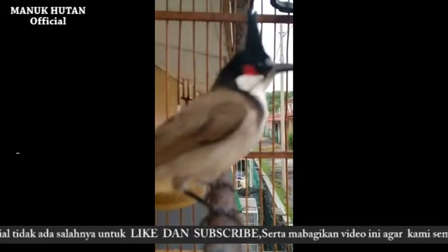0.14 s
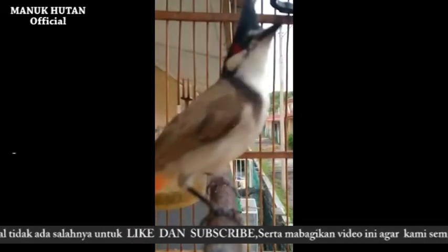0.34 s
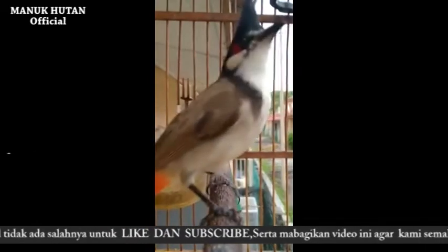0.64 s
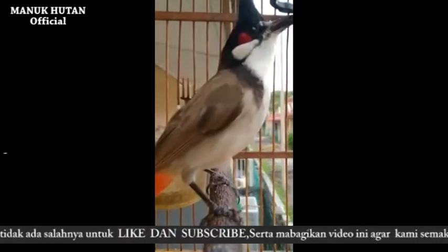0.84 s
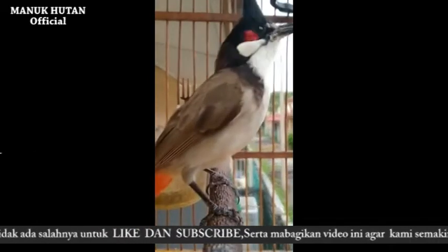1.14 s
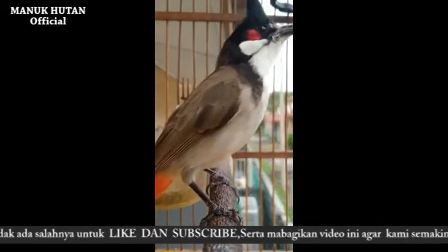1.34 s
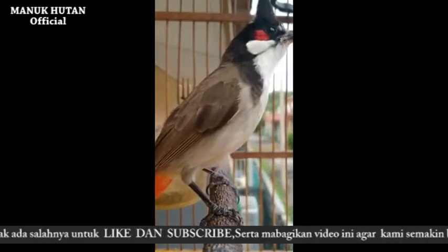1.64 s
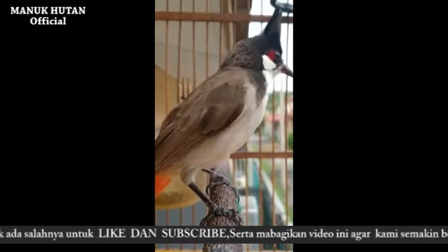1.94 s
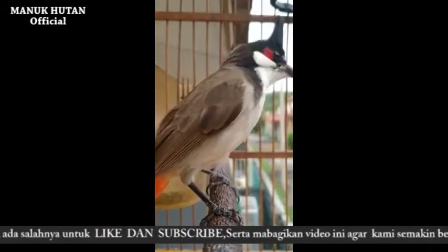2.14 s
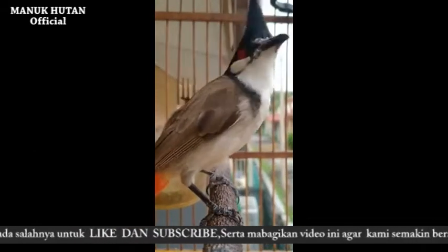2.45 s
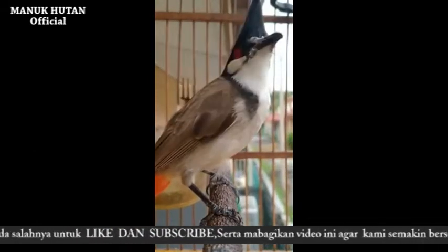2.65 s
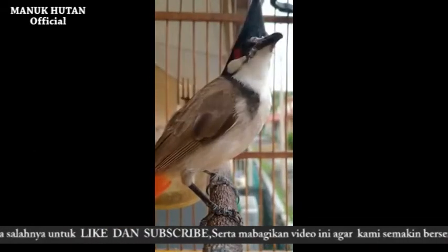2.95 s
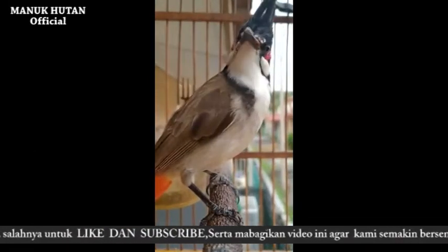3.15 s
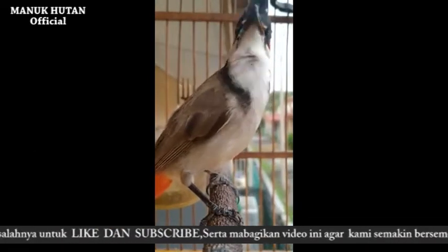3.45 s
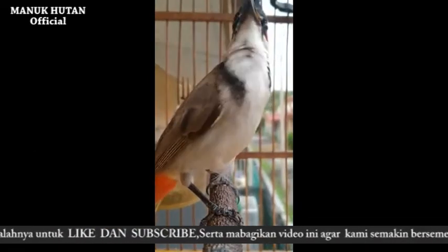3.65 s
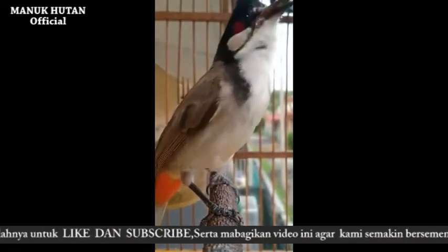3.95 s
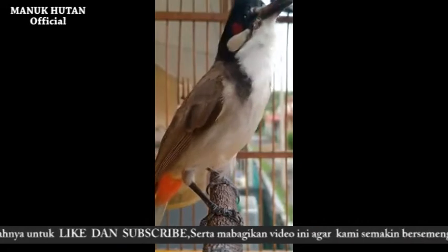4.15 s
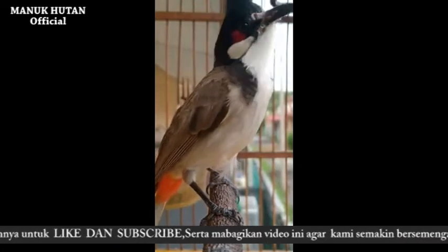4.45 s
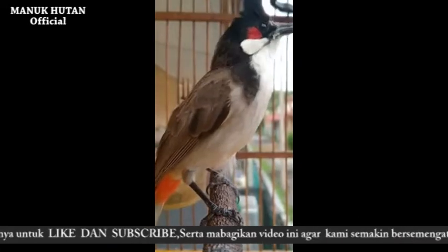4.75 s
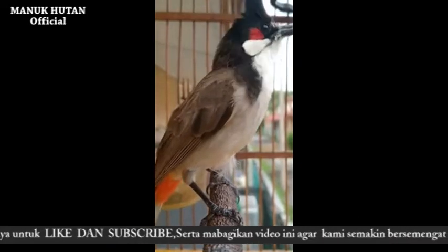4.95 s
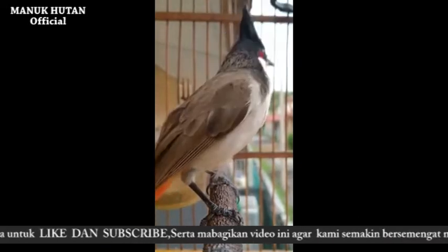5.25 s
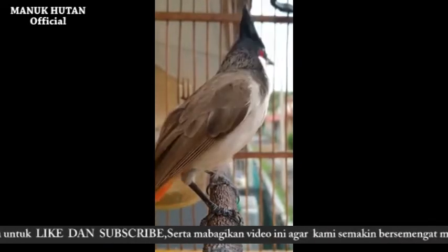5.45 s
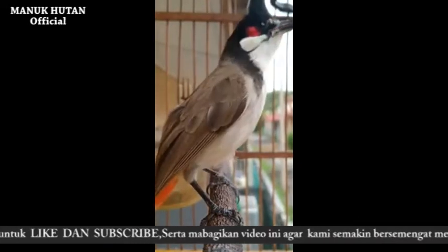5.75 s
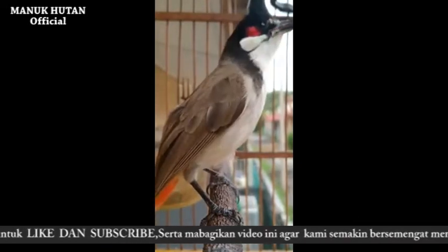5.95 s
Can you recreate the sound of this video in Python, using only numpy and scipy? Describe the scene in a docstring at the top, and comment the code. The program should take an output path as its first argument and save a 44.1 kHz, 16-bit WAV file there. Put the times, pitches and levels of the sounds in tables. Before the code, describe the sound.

Mostly quiet outdoor ambience: soft far traffic, low rumble, airy hiss and small wind thumps on the microphone. Early on, a nearby bird mutters quiet raspy notes as feathers brush and a finger taps lightly. A far bird whistles downward, blurred by veranda echo, and a muffled knock follows. After two more distant whistles, the near bird bursts into three short, loud, clear chirps with fast trills, leaving a short bright echo and near silence, with one last barely audible far call.

```python
"""On a veranda, close to a phone's microphone, a caged bulbul mutters soft, hoarse notes from 0.4 s,
with feathers brushing and a tap of a finger on the phone. A far bird answers at 0.9 s, mostly as echo; the
third soft note follows at 1.1 s and a far, dull knock at 1.8 s. The far bird calls twice after 3 s; from 4.2 s
the bulbul sings three loud, warbling chirps, and a last far call comes at 6 s. Birds are gliding whistles with
overtones and rasp; under them lie shaped-noise street, rumble and hiss, faint tones and puffs of wind."""
import sys
import numpy as np
from scipy import signal
from scipy.fft import rfft, irfft, next_fast_len
from scipy.io import wavfile
from scipy.ndimage import uniform_filter1d, map_coordinates

SR = 44100
rng = np.random.default_rng(int(sys.argv[2]) if len(sys.argv) > 2 else 0)


def wav_out(sig):
    """Save sig, one row per channel (or a flat mono array), as 16-bit PCM at SR to the path in sys.argv[1]."""
    wavfile.write(sys.argv[1], SR, np.round(np.clip(np.atleast_2d(sig).T, -1, 1) * 32767).astype(np.int16))


N = 268921
T = np.arange(N) / SR  # time in seconds

# Loud chirps close to the microphone, note by note. Each row: overtones in dB and rasp in dB against the
# note, then its course, whose rows are: time in seconds, pitch in Hz (before any warble), level in dB.
CHIRP_NOTES = [(-20.5, -21, [(4.231, 1793, -59.5), (4.235, 1910, -39.5), (4.2405, 2176, -43),
               (4.243, 2930, -20), (4.247, 3010, -25.5), (4.255, 3240, -15.5), (4.267, 3238, -17),
               (4.276, 3182, -16), (4.2805, 2990, -23.5), (4.283, 3000, -20.5), (4.288, 3190, -16),
               (4.2915, 3290, -40.5)]), (-14, -11.5, [(4.296, 2200, -69), (4.301, 1630, -60.5),
               (4.307, 1090, -60.5)]), (-22, -13.5, [(4.494, 1900, -57), (4.502, 1930, -53.5),
               (4.506, 2693, -44.5), (4.5095, 3830, -31.5), (4.512, 2950, -22), (4.52, 2930, -16),
               (4.527, 2690, -27.5), (4.541, 2730, -20.5), (4.5475, 2668, -32.5)]),
               (-11, 4, [(4.5477, 2766, -29), (4.551, 2522, -31), (4.5573, 2400, -31.5)]),
               (-13.5, -19.5, [(4.5575, 2623, -34), (4.5605, 3260, -14.5), (4.567, 3317, -16.5),
               (4.584, 3314, -17), (4.589, 3336, -20.5), (4.598, 3526, -31), (4.6005, 3140, -35)]),
               (-22.5, -17.5, [(4.601, 1900, -53.5), (4.605, 1350, -54), (4.611, 886, -61)]),
               (-15.5, -16.5, [(4.665, 1068, -54), (4.671, 1974, -41), (4.678, 2130, -29),
               (4.682, 2065, -21.5)]), (-12, -16, [(4.6822, 2083, -22), (4.687, 2068, -17.5),
               (4.697, 1879, -26)]), (-22.5, -7, [(4.6972, 2000, -21.5), (4.7, 2600, -36.5),
               (4.704, 2465, -23.5), (4.709, 2330, -24), (4.7105, 2385, -32), (4.7125, 2837, -19.5),
               (4.719, 2716, -25.5), (4.7235, 2630, -29.5), (4.7265, 2980, -18.5), (4.73, 2947, -18),
               (4.733, 2742, -35), (4.7393, 2710, -32)]), (-27, -20, [(4.7395, 2840, -34),
               (4.743, 3880, -30), (4.746, 3137, -14.5), (4.75, 3010, -19.5), (4.759, 2994, -20.5),
               (4.763, 3357, -33), (4.766, 2837, -27), (4.7685, 2247, -36.5), (4.7713, 2880, -36)]),
               (-13.5, -16.5, [(4.7715, 2557, -41), (4.777, 2287, -24.5), (4.788, 2226, -29.5),
               (4.795, 2146, -26.5), (4.8, 2162, -38.5)])]
# Fast pitch swings on the chirps. Each row: first crest in seconds, number of swings, swings per second,
# depth in Hz, centre away from the throat's tuning in Hz, dying time in seconds, throat width in Hz,
# lean from 0 to 1 (quick rise, slow sag).
CHIRP_WARBLES = [(4.2432, 2.85, 86, 500, -250, .045, 250, .25), (4.511, 3.8, 222, 190, -170, .02, 160, 0),
                 (4.5635, 3.2, 82, 720, 300, .022, 380, 0)]
# Strength of an overtone by where it falls, before the fall per overtone. Each row: frequency in Hz, level in dB.
CHIRP_OVERTONES = [(2400, -1), (4500, -7), (6500, -21), (8200, -11.5), (10000, -18.5), (12000, -10.5),
                   (15000, -8), (16200, -28)]
# Air in the throat while singing. Each row: frequency in Hz, relative level in dB per Hz.
CHIRP_AIR = [(2940, -29.5), (5000, -0.5), (5810, -22), (7920, -7.5), (8410, -9.5), (8880, -46),
             (9340, -39.5), (9960, -17), (10800, 0.5), (13200, -7.5), (15200, 13.5), (16300, -16.5),
             (16500, -21.5)]
# Soft, hoarse notes of the near bird. Each row: overtones in dB and rasp in dB against the note, then its
# course, whose rows are: time in seconds, pitch in Hz, level in dB.
MUTTER_NOTES = [(0.5, -9, [(.422, 1167, -59), (.429, 1273, -53), (.434, 1767, -55), (.439, 2006, -46),
                (.446, 1920, -53), (.45, 1880, -68)]), (-1, -10, [(.487, 1250, -65), (.493, 1125, -54),
                (.5, 1600, -54), (.506, 1154, -48.5), (.511, 1380, -56), (.516, 1580, -58),
                (.52, 1750, -60)]), (-15, -30, [(1.062, 1098, -72), (1.065, 1186, -59),
                (1.068, 1202, -66)]), (2, -12, [(1.074, 1065, -54), (1.08, 1403, -49), (1.085, 2080, -43),
                (1.0885, 1382, -44), (1.094, 1657, -49), (1.1, 1950, -40.5), (1.109, 1393, -61),
                (1.113, 1550, -74), (1.128, 1770, -72)])]
# Overtones of the soft notes, before the fall per overtone. Each row: frequency in Hz, level in dB.
MUTTER_OVERTONES = [(2200, -15), (3100, 2.5), (3900, -14), (4800, -13.5), (6000, -53), (7500, -18),
                    (9000, -25), (16000, -38)]
# Air in the soft notes. Each row: frequency in Hz, relative level in dB per Hz.
MUTTER_AIR = [(700, -27), (1500, 11), (3000, 5.5), (5000, -20), (8000, 0), (13000, -12), (15200, -7),
              (15800, -43)]
# A notch near 9 kHz, left by audio coding. The one row: centre in Hz, width in Hz, depth in dB.
CODING_NOTCH = (8950, 1400, -31)
# The far bird; its direct sound is turned down later. Each row: overtones in dB and rasp in dB against the
# note, then its course, whose rows are: time in seconds, pitch in Hz, level in dB.
FAR_NOTES = [(-40, -60, [(.855, 1910, -59), (.868, 2850, -51), (.885, 3387, -58.5), (.92, 2836, -52.5),
             (.954, 2450, -61)]), (-40, -55, [(3.08, 2730, -63), (3.088, 3510, -50.5), (3.099, 3880, -60),
             (3.112, 3420, -47), (3.125, 2940, -48), (3.136, 2600, -59)]), (-40, -55, [(3.258, 4740, -60),
             (3.266, 3960, -60), (3.269, 3750, -46), (3.278, 3440, -49), (3.287, 3180, -49),
             (3.305, 2850, -46.5), (3.335, 2470, -49.5), (3.36, 2100, -59.5), (3.4, 1680, -65)]),
             (-42, -59, [(6.02, 1745, -85), (6.034, 2100, -72), (6.049, 2500, -81)])]
# Reverberation of the veranda, before each distance stretches it. Each row: frequency in Hz, t60 in seconds.
VERANDA_T60 = [(1000, 0.17), (2200, 0.46), (3000, 0.44), (5000, 0.376), (12000, 0.14)]
# What the walls send back of the near bird. Each row: frequency in Hz, level in dB.
WALL_RETURN = [(1000, -34), (2200, -16), (3000, -22.5), (4000, -19.5), (8000, -19), (14000, -18)]
# Wind puffs on the microphone. Each row: centre in seconds, peak in dB, frequency in Hz.
WIND_PUFFS = [(0.433, -43, 53), (0.494, -47.5, 35), (0.759, -44.5, 45), (.85, -47, 29.6),
              (1.411, -46.5, 38.4), (1.509, -44, 44.8), (1.798, -44, 35.6), (1.889, -42.5, 56),
              (2.5, -49, 30.2), (2.614, -39.5, 33), (3.65, -54, 60), (5.488, -59, 41.1)]
# A finger on the phone. The one row: level in dB before the push is shaped, length of the push in seconds.
FINGER_TAP = (-36, .0025)
# Feathers brushing. Each row: centre in seconds, length in seconds, level in dB.
FEATHER_RUSTLES = [(0.408, 0.033, -65), (0.434, 0.014, -55.5), (0.458, 0.041, -70)]
# A far, dull knock. The one row: level in dB, t60 in seconds.
FAR_KNOCK = (-53, 0.56)
# Colour of the knock. Each row: frequency in Hz, relative level in dB per Hz.
KNOCK_COLOUR = [(200, 1.5), (500, 0.5), (1000, 1.5), (2000, -4), (3200, -15.5), (5000, -37)]
# Faint, wavering tones. Each row: centre in seconds, length in seconds, pitch in Hz, level in dB.
FAINT_TONES = [(0.62, 0.17, 431, -72), (2.397, 0.064, 1385, -73), (3.16, 0.038, 1153, -69),
               (3.173, 0.13, 495, -71.5), (3.666, .18, 520, -74), (5.022, 0.17, 340, -74),
               (5.522, 0.092, 1067, -78.5), (5.547, 0.12, 2168, -82.5), (5.599, .05, 712, -78)]
# Course of the background. Each row: time in seconds, traffic in dB, hiss in dB.
STREET_LEVELS = [(0.0, -69, -84), (0.17, -69, -75), (0.4, -64.5, -73.5), (0.7, -66, -77.5),
                 (0.999, -65, -78), (1.3, -68.5, -80), (1.75, -68, -83.5), (1.88, -66, -78),
                 (2.2, -69.5, -80.5), (2.7, -65, -70), (3.04, -66, -77), (3.5, -66, -77), (4.1, -74, -84.5),
                 (4.43, -66, -77.5), (4.65, -73, -74), (4.9, -65.5, -75.5), (5.33, -72, -84.5),
                 (6.1, -73, -85.5)]
# Colours of far traffic, its rumble and the air hiss. Each row: frequency in Hz, relative level in dB per Hz.
TRAFFIC_COLOUR = [(80, -31.5), (150, 0), (400, -4.5), (1000, -6.5), (2500, -12), (4000, -19), (6000, -42)]
RUMBLE_COLOUR = [(10, -2), (30, -0.5), (70, -8), (90, -6), (105, -1), (125, -8.5), (160, -19), (300, -53.5)]
HISS_COLOUR = [(1500, -5.5), (4000, -1), (7500, 2), (9000, -1.5), (11000, -2.5), (13500, -0.5),
               (13900, -11), (14400, -51.5)]

TAP_S, KNOCK_S = .4495, 1.826  # starts in seconds
RUMBLE_DB = 6  # rumble over the traffic
JOIN_S = .002  # one note fades into the next
STRAIN = 0.21  # share of the whistle's loss in dB that the overtones and the rasp gain
TOP_HZ = 16600  # band limit of the phone


def voice(notes, warbles, colour, air, fall_db, rough):
    """A bird's whistle glides from note to note, with overtones, a faint half pitch and a rasp of air."""
    tone, over, rasp = np.zeros((3, N))
    for over_db, rasp_db, rows in notes:
        s, _, db = np.transpose(rows)
        span = slice(round((s[0] - JOIN_S) * SR), round((s[-1] + JOIN_S) * SR))
        t = T[span]
        fade = np.clip(np.minimum(t - s[0], s[-1] - t) / JOIN_S + .5, 0, 1)
        swell = amp(np.interp(t, s, db)) * fade
        tone[span] += swell
        over[span] += swell * amp(over_db)
        rasp[span] += swell * amp(rasp_db)

    # away from its tuning the throat weakens the whistle and strengthens the rest
    swing_hz, loss_db = warble(warbles)
    strain = amp(STRAIN * loss_db)
    tone = smooth(tone * amp(-loss_db), 1)
    over = smooth(over * strain, 1)
    rasp = smooth(rasp * strain, 6)

    s, pitch_hz, _ = np.concatenate([rows for *_, rows in notes]).T
    glide = smooth(np.interp(T, s, pitch_hz) + swing_hz, 2)
    hz = glide * (1 + .05 * rough * wobble(400))
    phase = 2 * np.pi * np.cumsum(hz) / SR
    overtones = np.zeros(N)
    for k in range(2, 9):
        level_db = along(colour, k * hz) - fall_db * (k - 1.5) + 4.18 * wobble(250)
        overtones += amp(level_db) * np.sin(k * phase)
    flutter = amp(5 * rough * wobble(500))
    half_pitch = amp(-46.5) * np.sin(phase / 2)
    whistle = tone * (flutter * np.sin(phase) + half_pitch) + over * overtones
    # the air pulses once per cycle of the whistle
    breath = rasp * (1 + 0.4 * np.cos(phase)) * noise(air, patchy_db=7.5)
    centre, width, depth_db = CODING_NOTCH
    notch = lambda hz: amp(depth_db * np.exp(-(2 * (hz - centre) / width) ** 4))
    return filtered(np.sqrt(2) * whistle + breath, notch)


def warble(rows):
    """Dying swings of pitch (Hz) off the throat's tuning, and the level (dB) the whistle loses there."""
    swing_hz, loss_db = np.zeros((2, N))
    for crest, count, rate, depth_hz, centre_hz, dying, width_hz, lean in rows:
        turns = (T - crest) * rate
        gate = np.clip(4 * turns + 1, 0, 1) * np.clip(2 * (count - turns), 0, 1)
        angle = 2 * np.pi * turns
        swing = np.cos(angle + lean * (np.cos(angle) - 1))
        depth = depth_hz * np.exp(-((T - crest) / dying) ** 2)
        away = gate * (centre_hz + depth * swing)
        swing_hz += away
        loss_db += 20 * np.log10(1 + (away / width_hz) ** 2)
    return swing_hz, loss_db


def echoes(x, delay, build, stretch):
    """Diffuse veranda tail: each frequency dies at its own speed, with new reflections every fifth of a second."""
    out, block = np.zeros(N), SR // 5
    for at in range(0, N, block):
        part = x[at:at + block]
        if np.max(np.abs(part)) > 1e-4:  # near-silent blocks send back nothing
            hz, t, z = signal.stft(rng.standard_normal(SR), SR, nperseg=256)
            t60 = stretch * along(VERANDA_T60, hz)[:, None]
            tail = signal.istft(z * amp(-60 * t / t60), SR, nperseg=256)[1]
            # silent for delay seconds, then rising for build seconds
            tail = tail * np.clip((np.arange(len(tail)) / SR - delay) / build, 0, 1)
            wet = signal.fftconvolve(part, tail / np.linalg.norm(tail))[:N - at]
            out[at:at + len(wet)] += wet
    return out


def wind_puffs():
    """Each puff of wind on the microphone is a short, low wobble."""
    puffs = np.zeros(N)
    for s, db, hz in WIND_PUFFS:
        age = T - s
        puffs += amp(db) * np.cos(2 * np.pi * hz * age) * np.exp(-(1.43 * hz * age) ** 2)
    return puffs


def finger_tap():
    """A finger on the phone gives one push and its rebound."""
    db, push = FINGER_TAP
    u = np.clip((T - TAP_S) / push, 0, None)
    return amp(db) * (1 - np.exp(-12 * u)) * (1 - u) * np.exp(-u)


def feathers():
    """Feathers brush close by: short swells of bright, patchy noise."""
    brush = sum(amp(db) * np.exp(-(2 * (T - s) / length) ** 2) for s, length, db in FEATHER_RUSTLES)
    # Each row: frequency in Hz, relative level in dB per Hz.
    colour = [(500, -10), (2000, 4), (9000, -3), (14000, 10), (15500, -27), (16000, -40)]
    return brush * noise(colour, patchy_db=4.0)


def far_knock():
    """A dull knock far off: dark noise with a soft onset that dies away exponentially."""
    db, t60 = FAR_KNOCK
    age = np.clip(T - KNOCK_S, 0, None)
    onset = 1 - np.exp(-age / 0.011)
    return amp(db - 60 * age / t60) * onset * noise(KNOCK_COLOUR, patchy_db=-0.5)


def faint_tones():
    """Short, faint sines, wavering together in pitch and each alone in level."""
    drift = np.cumsum(1 + 0.0099 * wobble(20)) / SR
    out = np.zeros(N)
    for s, length, hz, db in FAINT_TONES:
        swell = np.exp(-(2 * (T - s) / length) ** 4)
        level = amp(db + 2.9 * wobble(32))
        out += level * swell * np.sqrt(2) * np.sin(2 * np.pi * hz * drift)
    return out


def street():
    """Far traffic and its rumble rise and fall together as shaped noise; air hiss has its own course."""
    s, *levels = np.transpose(STREET_LEVELS)
    traffic, hiss = (amp(np.interp(T, s, db)) for db in levels)
    rumble = amp(RUMBLE_DB) * noise(RUMBLE_COLOUR, patchy_db=0.0)
    road = noise(TRAFFIC_COLOUR, patchy_db=2.0) + rumble
    return traffic * road + hiss * noise(HISS_COLOUR, patchy_db=2.0)


def noise(spectrum, patchy_db):
    """Coloured noise of rms 1 with patches of random gain in time and frequency."""
    z = signal.stft(rng.standard_normal(N), nperseg=512)[2]
    field = uniform_filter1d(rng.standard_normal(z.shape), size=6, axis=0)
    field = uniform_filter1d(field, size=10, axis=1)
    patchy = signal.istft(z * amp(patchy_db * unit(field)), nperseg=512)[1][:N]
    return unit(filtered(patchy, lambda hz: amp(along(spectrum, hz))))


def wobble(rate):
    """A smooth random curve, rate knots a second."""
    return map_coordinates(rng.standard_normal(int(N * rate / SR) + 4), [T * rate])


def smooth(x, ms):
    """Rounds a curve with a bell-shaped window about ms milliseconds long."""
    return np.convolve(x, np.hanning(ms * 44) / (ms * 22), "same")


def filtered(x, response):
    """x times a response of frequency."""
    m = next_fast_len(N + SR // 2)
    return irfft(rfft(x, m) * response(np.fft.rfftfreq(m, 1 / SR)), m)[:N]


def along(points, hz):
    """Reads (Hz, value) points on a log frequency axis."""
    f, v = np.transpose(points)
    return np.interp(np.log(hz + 1), np.log(f + 1), v)


def amp(db):
    """Decibels to amplitude."""
    return 10 ** (np.asarray(db) / 20)


def unit(x):
    """Scales x to rms 1."""
    return x / np.sqrt(np.mean(x ** 2) + 1e-20)


def scene():
    """The near bird and its walls, the far bird mostly as echo, then handling, wind and background."""
    song = voice(CHIRP_NOTES, CHIRP_WARBLES, CHIRP_OVERTONES, CHIRP_AIR, fall_db=1.5, rough=.25)
    mutter = voice(MUTTER_NOTES, [], MUTTER_OVERTONES, MUTTER_AIR, fall_db=2.5, rough=0.483)
    near = song + mutter
    near_echo = echoes(near, delay=0.0034, build=.01, stretch=1.2)
    walls = filtered(near_echo, lambda hz: amp(along(WALL_RETURN, hz)))
    far = voice(FAR_NOTES, [], CHIRP_OVERTONES, CHIRP_AIR, fall_db=4.5, rough=0.48)
    far_echo = echoes(far, delay=0.0014, build=0.0077, stretch=1.29)
    birds = near + walls + amp(-6.5) * far + far_echo
    close_sounds = wind_puffs() + finger_tap() + feathers()
    background = far_knock() + faint_tones() + street()
    return (birds + close_sounds + background)[None]


def record(dry):
    """The phone keeps nothing above its band limit."""
    return filtered(dry[0], lambda hz: hz < TOP_HZ)[None]


dry = scene()
out = record(dry)
wav_out(out)
```